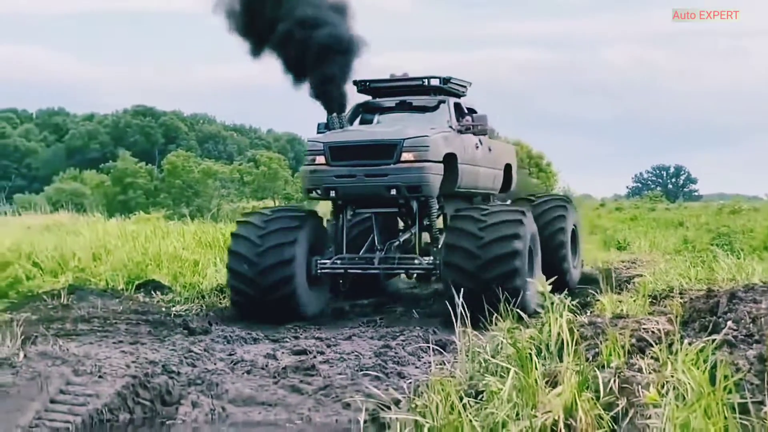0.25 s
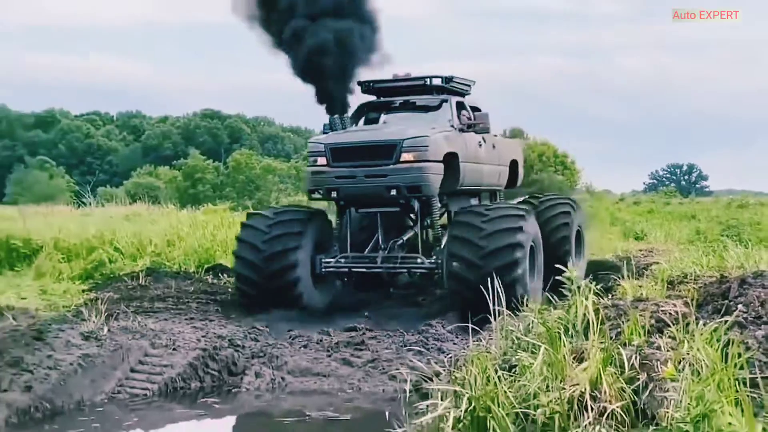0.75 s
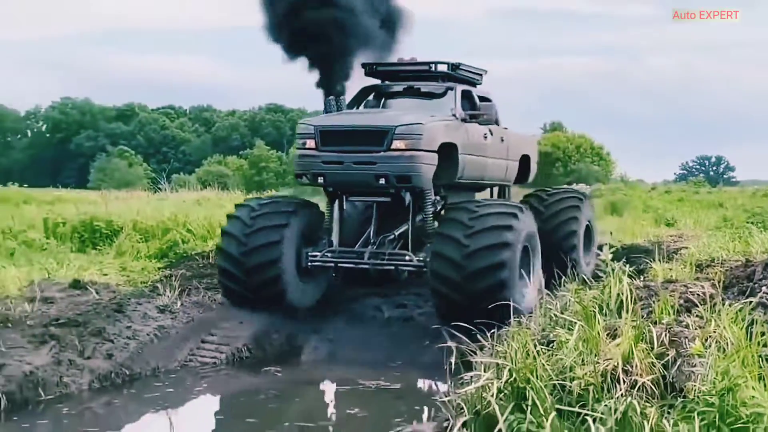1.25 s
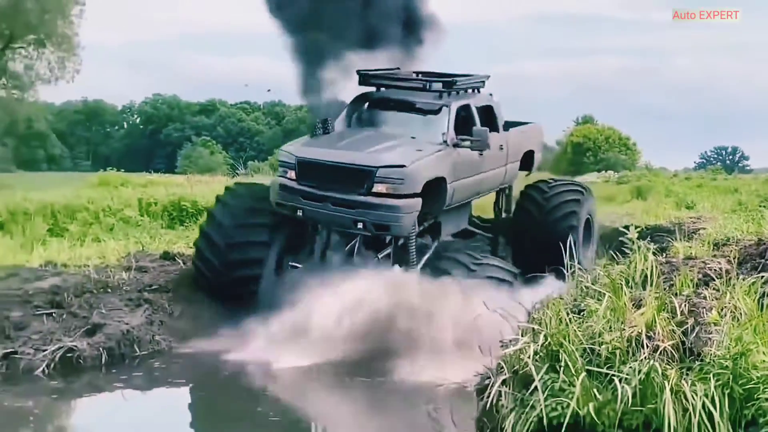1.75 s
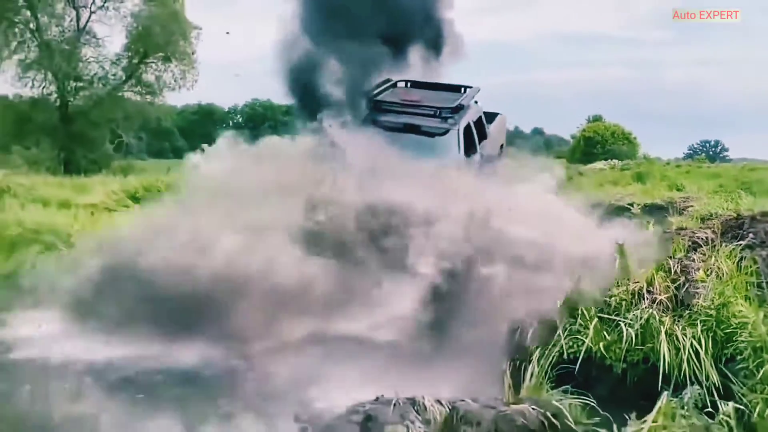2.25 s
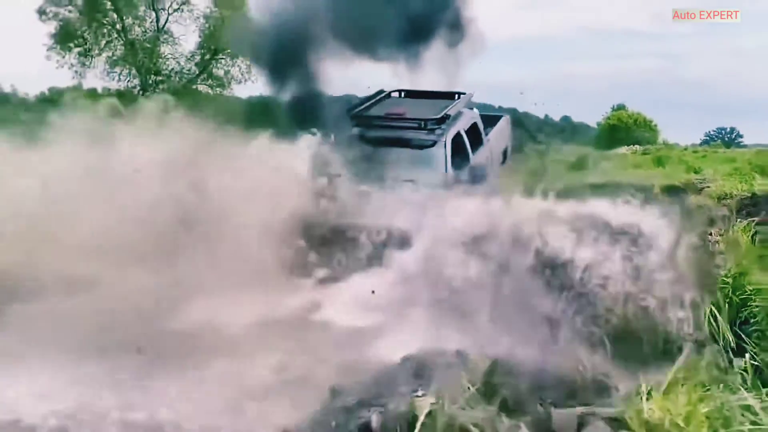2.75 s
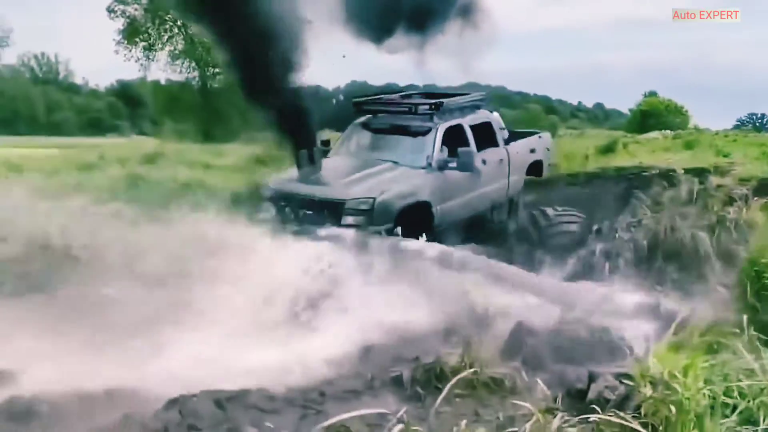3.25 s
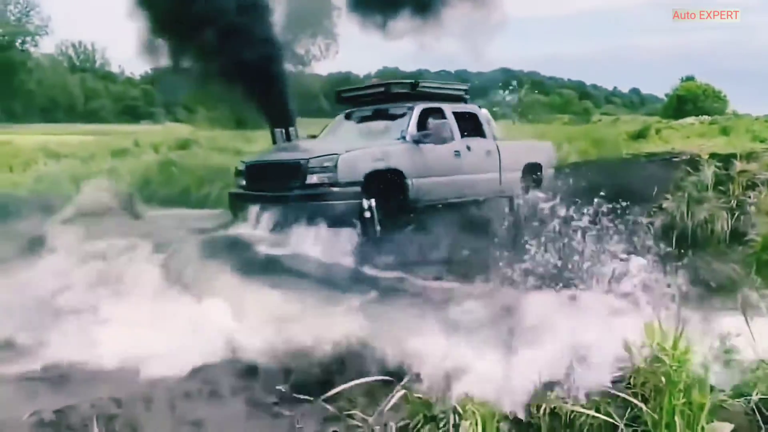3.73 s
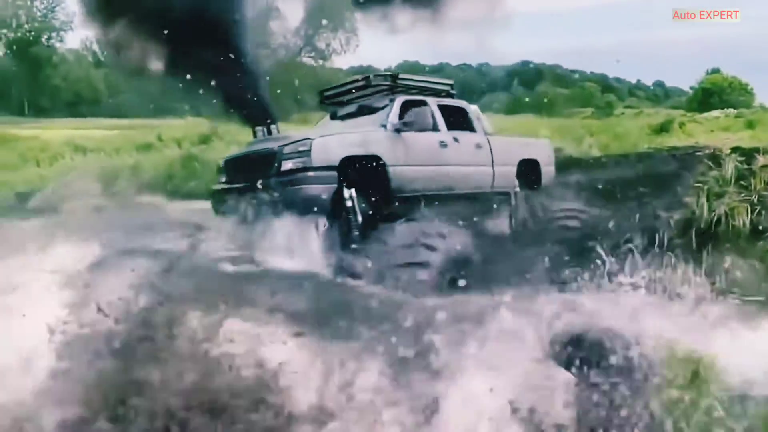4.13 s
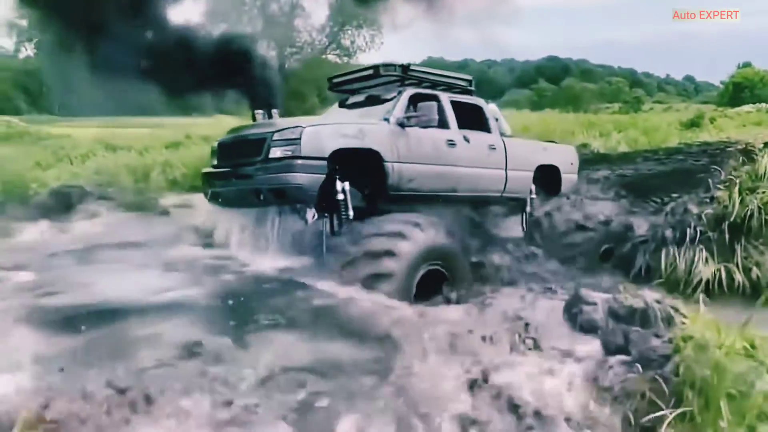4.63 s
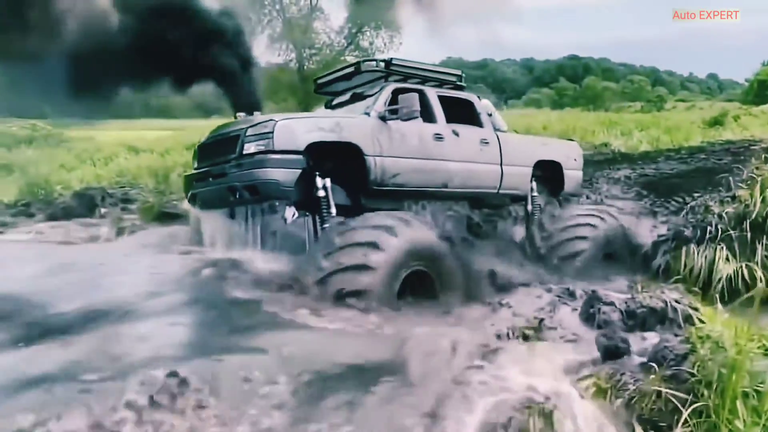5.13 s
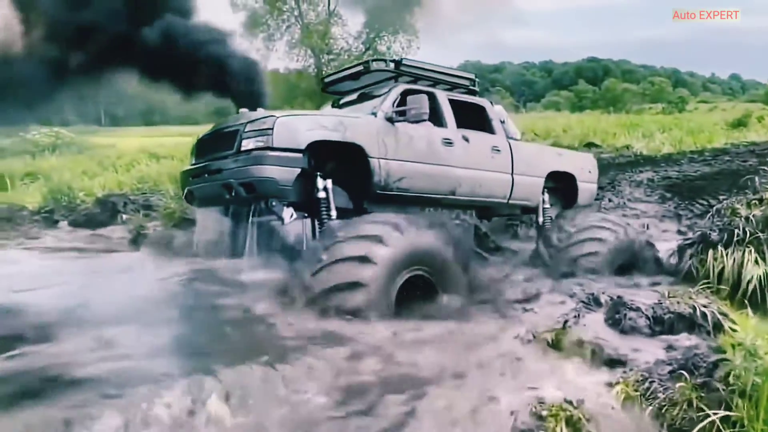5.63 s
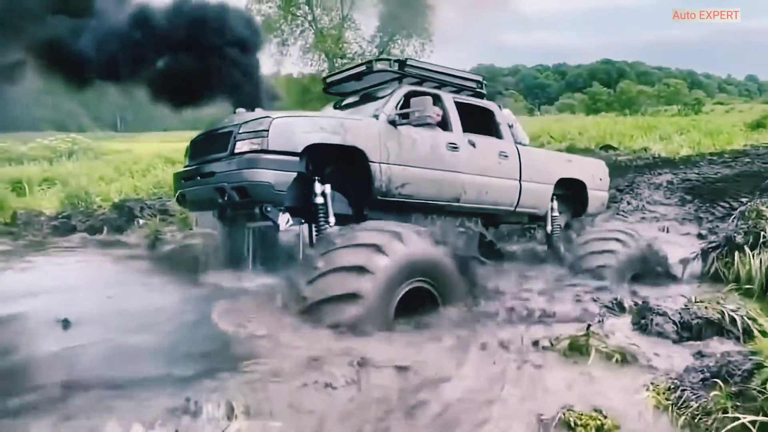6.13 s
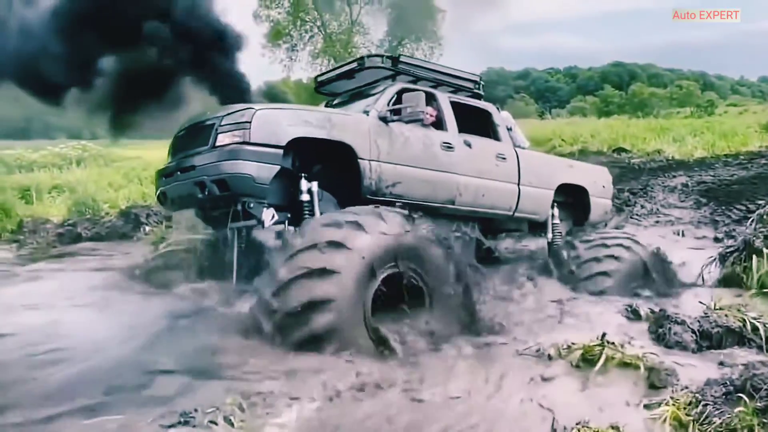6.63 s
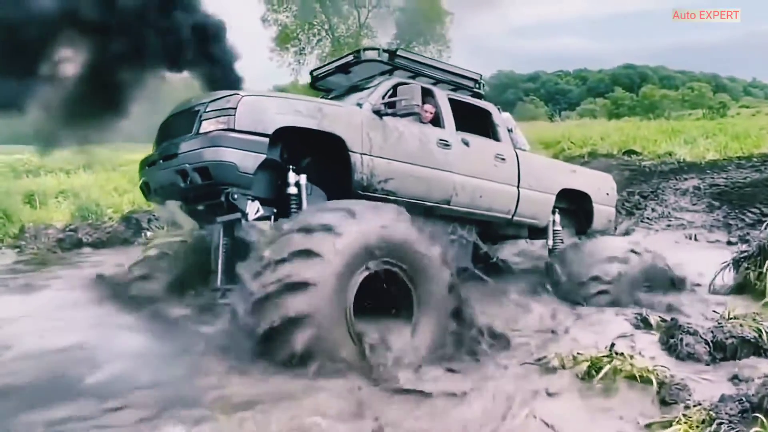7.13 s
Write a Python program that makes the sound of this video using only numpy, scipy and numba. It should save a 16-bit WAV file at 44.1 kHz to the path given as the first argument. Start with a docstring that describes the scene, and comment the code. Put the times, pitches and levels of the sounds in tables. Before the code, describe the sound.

A huge turbo-diesel truck in an open field revs hard, its open stacks giving a tonal, throbbing roar with raspy edges and a thin turbo whistle. At the peak the fuel cuts stutter rapidly; then the pitch drops as a raspy swell marks the engine dragging down. It labours on lower and quieter, a steady lumpy drone under fading hiss. Close stereo microphone, dry outdoor sound.

```python
"""A big turbo-diesel V8 truck in a field revs up, bounces off its speed limit, plunges into mud and labours on.
Its open stacks give clean firing tones, sums of cosines realigned at each throb, over a rough roar of clicks
and noise ringing in resonances; an uneven throb lands on a firing about every nine.
The turbo adds a moving band of hiss and a thin sine whistle; intake air and low rumble are shaped noise.
The microphone has two ports 10 cm apart: lows arrive together, the treble reaches the left port later."""
import sys
import numpy as np
from scipy import signal
from scipy.fft import rfft, irfft, next_fast_len
from scipy.io import wavfile
from scipy.ndimage import uniform_filter1d
from numba import njit

SR = 44100
rng = np.random.default_rng(int(sys.argv[2]) if len(sys.argv) > 2 else 0)


def put_to_file(sound):
    """Save the sound as 16-bit audio at rate SR, in the file named by the first command-line argument."""
    columns = np.atleast_2d(sound).T  # one column per channel
    safe = np.clip(columns, -1, 1)
    whole_steps = np.round(safe * 32767)
    wavfile.write(sys.argv[1], SR, whole_steps.astype(np.int16))


N = 325172   # samples

# Level columns hold before the trims, fuel cuts and drifts in the code, and before record().

# Engine with fuel on, and its clean tones at the firing rate, about its octave and about a quarter above it:
# start_s, firing_rate_hz, firing_level_db, octave_level_db, quarter_above_level_db
ENGINE = [(0, 164.1, -38, -32, -20.5), (0.3, 178.8, -23.5, -34, -15), (0.55, 192.7, -15.5, -21.5, -28.5),
          (0.85, 210.3, -16, -13, -37), (1.19, 232.7, -14.5, -11.5, -36.5), (1.6, 230.4, -17, -16, -37),
          (1.9, 225.2, -20.5, -12.5, -33), (2.18, 231, -13, -8.5, -67), (2.31, 229, -16.5, -13, -55),
          (2.4, 222.9, -18, -16.5, -47), (2.58, 211.2, -27, -15.5, -34), (2.75, 203.4, -32, -19, -39),
          (2.96, 199.7, -29, -18, -49), (3.1, 182.1, -26, -38, -38), (3.25, 167.3, -25.5, -72, -35),
          (3.8, 142, -29, -50, -35.5), (4.5, 140.6, -30, -48, -29.5), (5, 134.3, -31, -45, -27.5),
          (5.3, 136.9, -32.5, -53, -24), (6, 132.5, -24.5, -61, -25), (6.5, 129.9, -27.5, -47, -26.5),
          (7.37, 133, -32, -45, -28.5)]
# Weaker tones that follow the tone a quarter above: multiple_of_firing_rate, level_against_it_db
SIDE_TONES = [(.75, -14), (1.127, -16), (1.48, -4), (1.6, -12.5)]
# Higher orders that sharpen the throb: multiple_of_firing_rate, level_against_common_db
UPPER_TONES = [(2.253, -4), (2.48, -0.5), (2.601, -3), (2.86, -5), (3.125, -40), (3.27, -6), (3.38, -10),
               (3.49, -23), (3.625, -13), (3.75, -4), (4, -10.5)]
# Their common level: start_s, level_db
UPPER_LEVEL = [(0, -23.5), (.3, -19), (.6, -28), (1, -75), (2.3, -24), (2.6, -21), (3, -36.5), (3.4, -34),
               (3.8, -39), (4.5, -43), (5.2, -39), (6.3, -32.5), (7.37, -33)]
# Where the stacks are dead, for the side and upper tones: pitch_hz, gain_db
DEAD_BAND = [(225, 0), (250, -18), (312, -18), (340, 0), (580, 0), (660, -16)]
# Tone at five eighths of the firing rate, which runs on through the throbs: start_s, level_db
LOWEST_TONE = [(0, -26), (.12, -21), (.3, -29), (.5, -24.5), (.7, -40), (1.2, -47), (1.75, -32), (2.2, -55),
               (2.5, -34.5), (2.9, -35.5), (3.3, -35), (4.5, -45), (7.37, -33)]
# Tones below the firing rate, and those half way to the octave, come late by these turns
LOW_LAG, MID_LAG = .33, .12

# The speed limit cuts the fuel: start_s, length_s, firing_tone_loss_db
FUEL_CUTS = [(1.194, 0.23, 6), (1.621, .10, 7), (1.74, 0.089, 4.5), (1.98, 0.064, 3), (2.073, 0.093, 11.5),
             (2.189, 0.13, 10.5)]
CUT_FALL_S, CUT_RETURN_S = 0.0081, 0.041   # the return begins after length_s
# Share of that loss (in dB) in the other sounds; a negative share swells them, from uneven running
CUT_QUARTER_ABOVE, CUT_OCTAVE = -1.2, 1.6
CUT_BOOM, CUT_BARK, CUT_RASP, CUT_HIGH, CUT_AIR = -0.81, 0.44, 0.68, 1, 0.29

# Average spacing of the throbs: start_s, spacing_firings
FIRINGS_PER_THROB = [(0, 8.89), (.75, 8.89), (.8, 8.775), (2.2, 8.775), (2.3, 8.95), (3.25, 8.95),
                     (3.35, 8.87), (7.37, 8.87)]
# The throb is deeper at low firing rates: firing_rate_hz, depth_0_to_1
THROB_DEPTH = [(135, .36), (230, .22)]
THROB_START = .64   # share of a throb already gone at the start
EARLY_LATE, STRAY = .15, .3   # firings by which throbs come early and late in turn, and by chance

# Rough roar with fuel on: start_s, boom_level_db, bark_level_db, rasp_level_db
ROAR = [(0, -18.5, -21, -32), (.25, -29.5, -22, -28.5), (.75, -28, -15.5, -26.5), (.95, -37, -19, -29.5),
        (1.17, -34.5, -17.5, -23.5), (1.9, -34.5, -17, -25), (2.55, -36, -21, -30),
        (2.83, -34.5, -25.5, -36.5), (3.3, -32, -26, -38.5), (3.65, -34.5, -37, -42.5),
        (4.3, -30, -33.5, -40), (4.75, -28.5, -33, -41.5), (5.2, -28, -29.5, -39.5), (6.6, -30, -32.5, -39),
        (7.37, -26.5, -31.5, -35.5)]
# Strength of eight firings, counted from each throb: level_db
CYLINDERS_DB = [3, -9.5, 3, 4, -1, 1.5, 1, 3]
# Stack resonances, from boom to rings: pitch_hz, width_hz, level_db
BOOM = [(95, 45, -2), (158, 114, -9), (195, 40, -7)]
BARK = [(326.5, 66, -3), (467, 52, -1), (527, 63.4, -2.5), (631.6, 74.5, -12.5)]
RASP = [(764, 41, 3.5), (885, 113, 1), (1043, 174, -1.5), (1295, 310, -4), (1505, 78, -5)]
HIGH_RASP = [(1500, 220, 4), (1790, 260, 6), (2190, 150, 4)]
RING = [(684.3, 96, 0)]
LOW_RING = [(530.7, 32, 0)]
# How the two rings come and go: start_s, level_db
RING_LEVEL = [(0, -31.5), (2.2, -34), (2.55, -36), (3, -34), (3.6, -42.5), (4, -38), (5, -38.5),
              (5.5, -41.5), (6.3, -44.5), (6.8, -35), (7.37, -34)]
LOW_RING_LEVEL = [(0, -38), (.27, -25), (.45, -33), (0.749, -28), (.9, -32), (2.2, -33), (2.35, -27),
                  (2.55, -19), (2.85, -26), (3.1, -36), (3.5, -51), (7.37, -48)]
# The high rasp lies this far under the rasp: firing_rate_hz, drop_db
HIGH_BELOW = [(140, 9), (180, 11.5), (230, 10)]
BARK_THROB = 1.5   # extra throb of the bark, times the throb depth
# One swell of the high rasp as the engine is dragged down in the water; half-width at 1/e of the dB
SWELL_S, SWELL_HALF_S, SWELL_DB = 2.52, 0.36, 11.5
SWELL_BARK = 0.11   # share of that swell in the bark

# Resonances that overtones of the firing rate cross: pitch_hz, width_hz, level_db
THROAT = [(1110, 70, -9), (1338, 180, 1)]
# Their common level: start_s, level_db
THROAT_LEVEL = [(0, -42), (.4, -42), (.5, -35), (.8, -35), (.9, -44), (1.05, -35), (1.3, -36), (1.45, -46),
                (2.3, -44), (3, -52), (5.38, -60), (5.5, -42), (5.6, -56), (5.75, -42), (5.87, -58),
                (5.98, -44), (6.07, -58), (6.16, -45), (6.3, -60), (7.37, -54)]

# Turbo: start_s, whistle_pitch_hz, whistle_level_db, compressor_hiss_level_db
TURBO = [(0, 5120, -54, -22.5), (.13, 5440, -51, -37.5), (.18, 5460, -27, -30), (.47, 6170, -40, -32),
         (.56, 6300, -52, -32), (.65, 6470, -27.5, -34.5), (.85, 6860, -38, -40.5), (1.13, 7717, -36, -48),
         (1.3, 8360, -36, -41.5), (1.5, 8400, -32, -43), (1.75, 8783, -33, -37), (1.95, 9000, -44, -41),
         (2.1, 9193, -29, -36), (2.25, 8700, -58, -41), (2.5, 8800, -64, -44), (2.75, 6860, -75, -35),
         (3.1, 6003, -48, -37.5), (3.5, 5718, -53, -44.5), (4, 5120, -65, -41.5), (4.6, 4950, -66, -44),
         (5, 4723, -60, -44.5), (5.8, 4663, -48, -39), (6.35, 4670, -52, -41.5), (6.7, 4616, -54, -45),
         (7.37, 4740, -63, -40)]
# Width of the compressor hiss: centre_hz, width_hz
HISS_WIDTH = [(7600, 320), (8700, 940), (10300, 1560), (12000, 5500), (14300, 2000)]
HISS_OVER_WHISTLE = 1.64   # pitch ratio
SAG_HZ_PER_DB, SAG_LAG_S = 45, .08   # the whistle sags while the fuel is cut

# Lower part of the intake air: start_s, level_db
AIR = [(0, -31), (.5, -30), (1, -31), (1.5, -28.5), (2, -31.5), (2.5, -36), (3.1, -44.5), (3.6, -47.5),
       (4, -42), (4.7, -44), (7.37, -40.5)]
# Its spectrum: pitch_hz, level_db_per_hz
AIR_COLOUR = [(1500, 7), (2450, 1.5), (2850, 5.5), (3300, 1.5), (5000, -0.5), (7000, -4.5), (8200, -11.5),
              (8700, -84)]
# Air over 7 kHz follows the boost: whistle_pitch_hz, level_db
TOP_AIR = [(5800, -47.5), (6300, -49), (7200, -37)]
# Rumble while the truck rolls: start_s, level_db
RUMBLE = [(0, -38), (.5, -29), (.95, -40), (1.3, -33), (1.55, -45), (1.8, -36), (2.1, -57), (2.6, -52),
          (7.37, -64)]

# From here the roar and hiss are wider between left and right; side over mid added to the hiss
WIDE_FROM_S, SPREAD = 2.47, 1.1
PORT_LAG = 13   # samples by which the treble reaches the left port later
CUTOFF_HZ = 15750


def fuel_cuts():
    """Loss in dB while the limiter cuts the fuel: quick fall, hold, return."""
    t = np.arange(N) / SR
    loss_db = 0
    for start, length, db in FUEL_CUTS:
        falling = (t - start) / CUT_FALL_S
        returning = (start + length - t) / CUT_RETURN_S + 1
        loss_db = loss_db + db * np.clip(np.minimum(falling, returning), 0, 1)
    return loss_db


def throb_firings(firings):
    """Numbers of the firings where a throb falls, at whole but uneven spacings."""
    mean = THROB_START + np.cumsum(np.gradient(firings) / in_time(FIRINGS_PER_THROB)[0])
    k = np.arange(1, int(mean[-1]) + 1)
    early_late = -EARLY_LATE * (-1.) ** k
    stray = STRAY * rng.standard_normal(len(k))
    inner = np.round(np.interp(k, mean, firings) + early_late + stray)
    return np.concatenate([[inner[0] - 9], inner, [inner[-1] + 9]])


def firing_tones(firings, throb_at, cut_db):
    """Orders of the firing rate, nearly in step at each throb; one throb's tones fade into the next half way."""
    rate_hz, first_db, octave_db, quarter_db = in_time(ENGINE)
    quarter_db = quarter_db - CUT_QUARTER_ABOVE * cut_db
    upper_db = in_time(UPPER_LEVEL)[0] - cut_db
    lines = [(1, first_db - cut_db), (2, octave_db - CUT_OCTAVE * cut_db), (1.235, quarter_db)]
    for group, common_db in ((SIDE_TONES, quarter_db), (UPPER_TONES, upper_db)):
        lines += [(k, common_db + db + follows(DEAD_BAND, k * rate_hz)) for k, db in group]

    following = np.searchsorted(throb_at, firings)
    since = firings - throb_at[following - 1]
    until = firings - throb_at[following]   # negative
    fade = np.clip(.5 + (since + until) / 5, 0, 1)
    lowest_phase = 2 * np.pi * 5 / 8 * firings + .4 * drift(8)
    out = amp(in_time(LOWEST_TONE)[0]) * np.cos(lowest_phase)
    for k, db in lines:
        lag_turns = LOW_LAG * (k < 1) + MID_LAG * (1.4 < k < 2) + .5 * (k == 2)
        waver = .25 * drift(6.3) - 2 * np.pi * lag_turns
        from_last = (1 - fade) * np.cos(2 * np.pi * k * since + waver)
        to_next = fade * np.cos(2 * np.pi * k * until + waver)
        out = out - amp(db + 1.4 * drift(2.6)) * (from_last + to_next)
    return np.sqrt(2) * out


def roar(firings, throb_at, depth, cut_db):
    """Cylinder blasts, turbulent puffs and a thump each throb ring the stacks; two draws of rasp for the spread."""
    boom_db, bark_db, rasp_db = in_time(ROAR)
    swell_db = SWELL_DB * np.exp(-((np.arange(N) / SR - SWELL_S) / SWELL_HALF_S) ** 2)
    high_db = rasp_db - follows(HIGH_BELOW, in_time(ENGINE)[0]) + swell_db - CUT_HIGH * cut_db
    boom_db = boom_db - CUT_BOOM * cut_db
    bark_db = bark_db + SWELL_BARK * swell_db - CUT_BARK * cut_db
    rasp_db = rasp_db - CUT_RASP * cut_db

    throb = np.interp(firings, throb_at, np.arange(len(throb_at)))
    since = firings - throb_at[throb.astype(int)]
    cylinder_db = np.asarray(CYLINDERS_DB)[since.astype(int) % len(CYLINDERS_DB)]
    blasts = rms_one(clicks(firings, uneven_db=3.0) * amp(cylinder_db))
    puffs = rms_one(rng.standard_normal((2, N)) * hump(firings, sharp=0.19))
    thumps = -amp(45) * depth ** 2 * butter(clicks(throb, uneven_db=1.5), 520, "low")
    beat = 1 - depth + 1.7 * depth * hump(throb, sharp=1.0)
    gas = (puffs[0] - 0.38 * blasts) * beat + thumps

    # the boom gets the thumps weak and reversed
    boom = butter(resonances(gas - 1.2 * thumps, BOOM), [58, 250], "band")
    bark = butter(resonances(gas, BARK, patchy_db=2.5), 359, "high", order=6)
    bark = bark * (1 + BARK_THROB * depth * hump(throb - .05, sharp=0.8))
    body = amp(boom_db) * evened(boom, size=5000) + amp(bark_db) * evened(bark, size=6000)
    for ring, level in ((RING, RING_LEVEL), (LOW_RING, LOW_RING_LEVEL)):
        ringing = resonances(resonances(gas, ring), ring)
        body = body + amp(in_time(level)[0]) * evened(ringing, size=6000)

    # the blasts are in the first draw only
    fizz = (puffs + .5 * blasts * [[1], [0]]) * (1 + .3 * depth * hump(throb, sharp=1.2))
    rasp = butter(resonances(fizz, RASP, patchy_db=1.7), 730, "high")
    high = butter(resonances(fizz, HIGH_RASP, patchy_db=2.0), [1350, 2450], "band", order=3)
    return body, amp(rasp_db) * evened(rasp, size=9000), amp(high_db) * evened(high, size=9000)


def overtones(firings, cut_db):
    """Wavering multiples of the firing rate, each as loud as the resonances it passes through."""
    rate_hz, out = in_time(ENGINE)[0], 0
    turns = firings + np.cumsum(1.5 * drift(5)) / SR
    for k in range(5, 12):
        gain = sum(amp(db) / (1 + (2 * (k * rate_hz - hz) / width) ** 2) for hz, width, db in THROAT)
        phase = 2 * np.pi * k * turns + 0.37 * drift(25)
        out = out + gain * amp(5.1 * drift(15)) * np.sin(phase)
    return np.sqrt(2) * amp(in_time(THROAT_LEVEL)[0] - CUT_RASP * cut_db) * out


def turbo(cut_db):
    """Noise twice through a resonance at the compressor's pitch and a wavering whistle below it."""
    whistle_hz, whistle_db, hiss_db = in_time(TURBO)
    hiss_hz = HISS_OVER_WHISTLE * whistle_hz
    width = follows(HISS_WIDTH, hiss_hz)
    r = np.exp(-np.pi * np.clip(width, 50, 6000) / SR)
    upper_hz = np.minimum(hiss_hz + 0.46 * width, 15200)   # the band trails off upward
    main_db = hiss_db + 4.0 + 2.0 * drift(18)
    upper_db = hiss_db - 26 + 0.93 * drift(4.7)
    hiss = 0
    for centre_hz, db in ((hiss_hz, main_db), (upper_hz, upper_db)):
        cos_w = np.cos(2 * np.pi * centre_hz / SR)
        hiss = hiss + amp(db) * evened(sweep(sweep(rng.standard_normal(N), r, cos_w), r, cos_w))

    lag = np.exp(-1 / (SAG_LAG_S * SR))
    sag_hz = SAG_HZ_PER_DB * signal.lfilter([1 - lag], [1, -lag], cut_db)
    phase = 2 * np.pi * np.cumsum(whistle_hz - sag_hz + 28 * drift(80)) / SR
    whistle = amp(whistle_db - 7 + 2.5 * drift(30) + 3 * drift(7)) * np.sin(phase)
    return butter(hiss, 6500, "high", order=6), whistle


def intake_air(cut_db):
    """Broad intake hiss with a shared flutter: two draws of coloured noise below, one of high-passed noise on top."""
    low_db = in_time(AIR)[0] - CUT_AIR * cut_db
    top_db = follows(TOP_AIR, in_time(TURBO)[0])
    flutter = amp(2.4 * np.tanh(drift(29)))
    low = rms_one(coloured(rng.standard_normal((2, N)), AIR_COLOUR))
    top = rms_one(butter(rng.standard_normal(N), 7200, "high", order=6))
    return amp(low_db) * flutter * low, amp(top_db) * flutter * top


def rumble():
    """Rolling rumble: noise in a band at the bottom, its level drifting in lumps."""
    noise = rms_one(butter(rng.standard_normal(N), [38, 72], "band"))
    return amp(in_time(RUMBLE)[0] + 2.0 * drift(6.3)) * noise


def amp(db):
    """Gain of a level in dB."""
    return 10 ** (np.asarray(db) / 20)


def rms_one(x):
    """Scaled to rms 1."""
    return x / np.sqrt(np.mean(x ** 2) + 1e-20)


def evened(x, size=4000):
    """Slow level divided out, over a window of size samples."""
    return x / np.sqrt(uniform_filter1d(x ** 2, size, axis=-1) + 1e-12)


def in_time(rows):
    """Columns of a curve table, one value a sample."""
    s, *columns = np.transpose(rows)
    return [np.interp(np.arange(N) / SR, s, c) for c in columns]


def follows(points, control):
    """Value of a (control, value) law."""
    return np.interp(control, *np.transpose(points))


def drift(rate):
    """Slow chance with spread 1: low-passed noise at a 40th of the sample rate, interpolated; rate in Hz."""
    r = np.exp(-80 * np.pi * rate / SR)
    noise = rng.standard_normal(N // 40 + 2002)
    slow = signal.lfilter([1], [1, -2 * r, r * r], noise)[2000:]   # drops the settling
    return np.interp(np.arange(N) / 40, np.arange(len(slow)), rms_one(slow))


def clicks(turns, uneven_db):
    """A click at each whole turn, of uneven strength."""
    whole = np.floor(turns)
    return np.diff(whole, prepend=whole[0]) * amp(uneven_db * rng.standard_normal(N))


def hump(turns, sharp):
    """One bump per turn, height 1 at whole turns."""
    return np.exp(sharp * (np.cos(2 * np.pi * turns) - 1))


def butter(x, hz, kind, order=2):
    """Butterworth filter."""
    return signal.sosfilt(signal.butter(order, hz, kind, fs=SR, output="sos"), x)


def resonances(x, modes, patchy_db=0):
    """Parallel resonances of alternating sign, each swelling and fading on its own by patchy_db."""
    out = 0
    for k, (hz, width, db) in enumerate(modes):
        r = np.exp(-np.pi * width / SR)
        b = (1 - r * r) / 2 * np.array([1, 0, -1])
        a = [1, -2 * r * np.cos(2 * np.pi * hz / SR), r * r]
        out = out + (-1) ** k * amp(db + patchy_db * drift(2.8)) * signal.lfilter(b, a, x)
    return out


@njit
def sweep(x, r, cos_w):
    """A two-pole resonance whose centre and width move."""
    y = np.zeros_like(x)
    for i in range(2, len(x)):
        drive = (1 - r[i] ** 2) / 2 * (x[i] - x[i - 2])
        y[i] = drive + 2 * r[i] * cos_w[i] * y[i - 1] - r[i] ** 2 * y[i - 2]
    return y


def coloured(x, spectrum):
    """Multiplies the spectrum of x by a (Hz, dB) curve, interpolated over log frequency."""
    size = next_fast_len(N)
    hz, db = np.transpose(spectrum)
    bin_hz = np.arange(size // 2 + 1) * SR / size + 1   # 1 Hz up, to avoid log(0)
    gain = amp(np.interp(np.log(bin_hz), np.log(hz), db))
    return irfft(rfft(x, size) * gain, size)[..., :N]


def scene():
    """Lows reach both ports alike, roar and hiss grow wider part-way, the treble reaches the left port late."""
    rate_hz, cut_db = in_time(ENGINE)[0], fuel_cuts()
    firings = np.cumsum(rate_hz) / SR
    throb_at, depth = throb_firings(firings), follows(THROB_DEPTH, rate_hz)
    clean = firing_tones(firings, throb_at, cut_db)
    body, rasp, high_rasp = roar(firings, throb_at, depth, cut_db)
    rush, whistle = turbo(cut_db)
    air, top_air = intake_air(cut_db)
    low = clean + body + rumble()
    rush = rush + top_air

    # side signal: opposite at the two ports
    spread = SPREAD * np.clip((np.arange(N) / SR - WIDE_FROM_S) / .1 + .5, 0, 1)
    side = amp(-26.0) * np.roll(low, 900)   # a late reflection
    side = side + 0.14 * spread * butter(np.roll(body, 500), 280, "high", order=4)
    side = side + (0.027 + 0.067 * spread) * rasp[1]
    side = side + (0.5 + 0.048 * spread) * high_rasp[1]
    side = side + (0.033 + spread) * air[1]

    dull = butter(whistle, 7400, "low", order=8)
    bright = rush + butter(whistle, 7400, "high", order=8)
    late = amp(-10) * np.roll(rush, 3000)   # a late reflection of the treble
    balanced_low = low * amp([[-.15], [.15]])   # a touch stronger at the right port
    mid = balanced_low + overtones(firings, cut_db) + rasp[0] + high_rasp[0] + air[0] + dull + late
    ports = np.stack([np.roll(bright, PORT_LAG), bright])
    return mid + side * [[1], [-1]] + ports


def record(dry):
    """Microphone chain: peaks are rounded, then the top is cut steeply."""
    rounded = 1.14 * np.tanh(dry / 1.237)
    return signal.sosfilt(signal.ellip(12, .5, 70, CUTOFF_HZ, fs=SR, output="sos"), rounded)


dry = scene()
out = record(dry)
put_to_file(out)
```